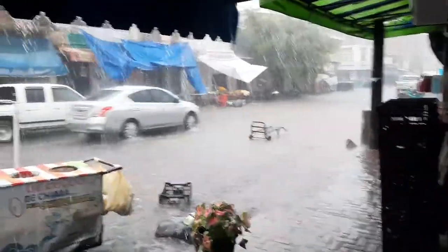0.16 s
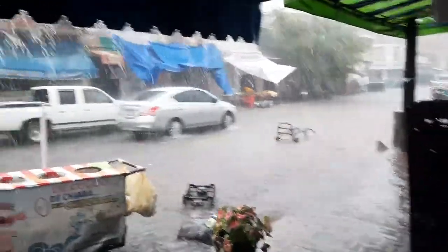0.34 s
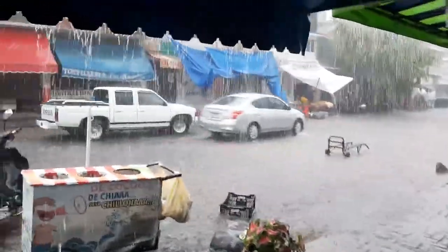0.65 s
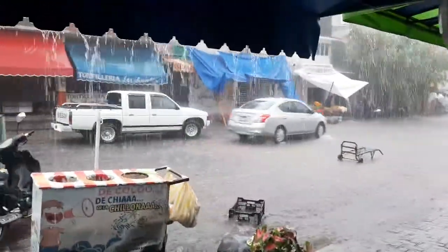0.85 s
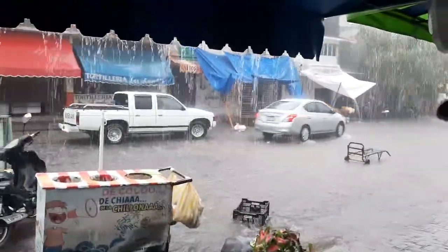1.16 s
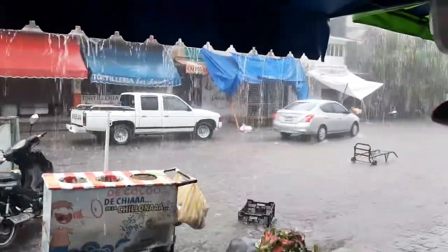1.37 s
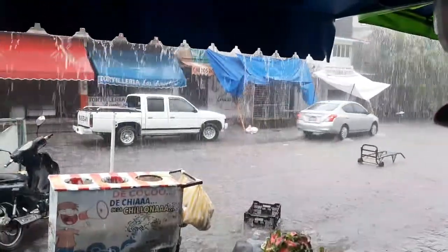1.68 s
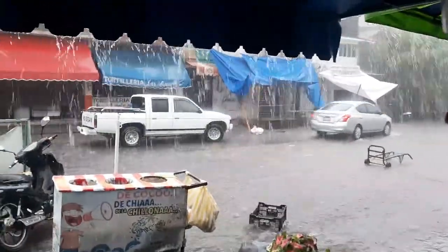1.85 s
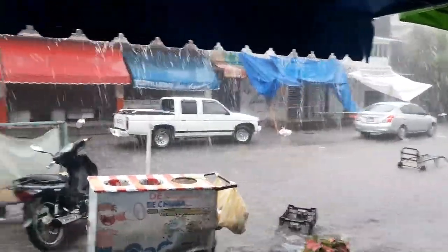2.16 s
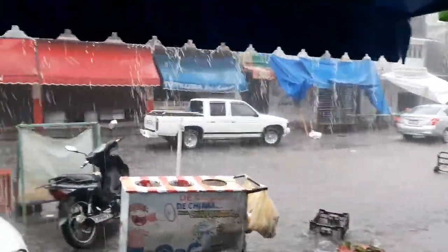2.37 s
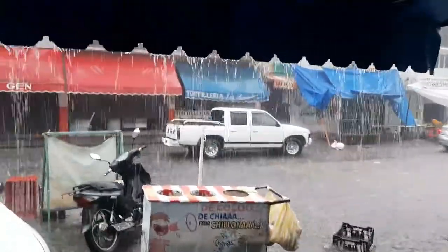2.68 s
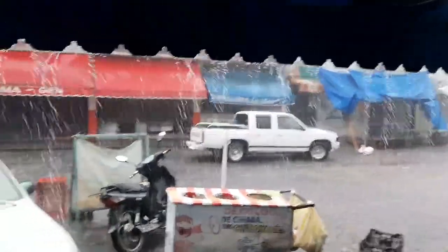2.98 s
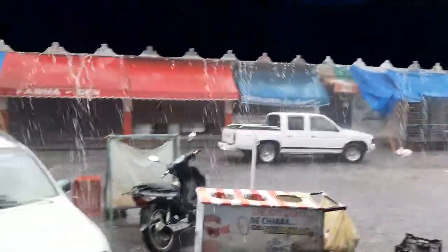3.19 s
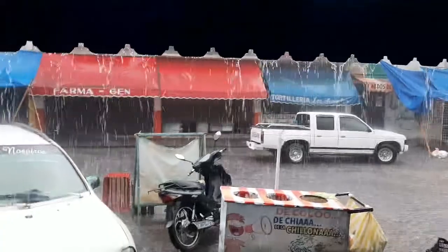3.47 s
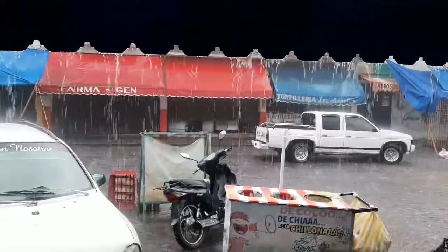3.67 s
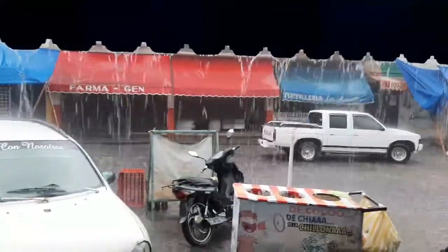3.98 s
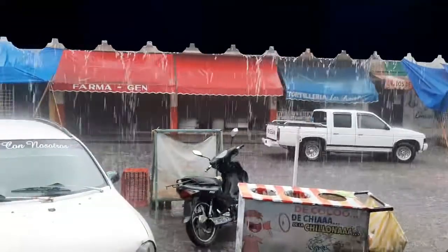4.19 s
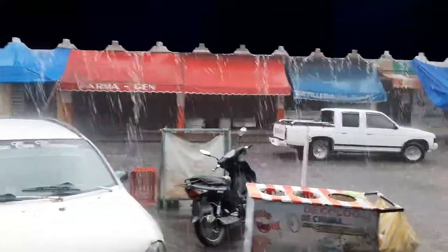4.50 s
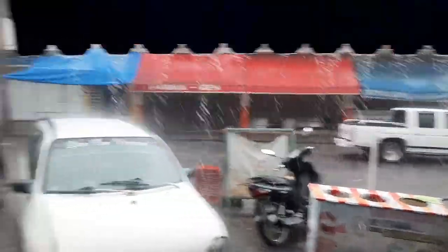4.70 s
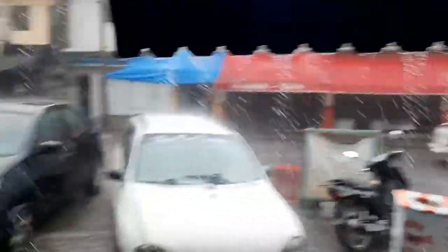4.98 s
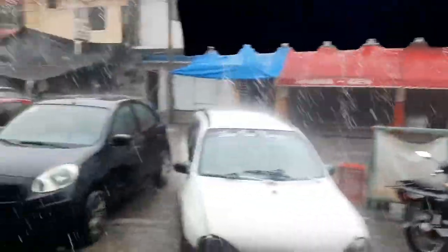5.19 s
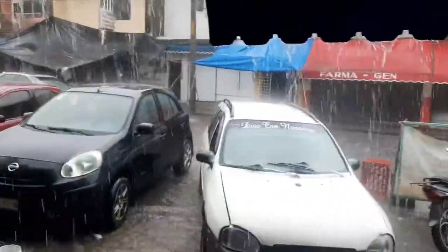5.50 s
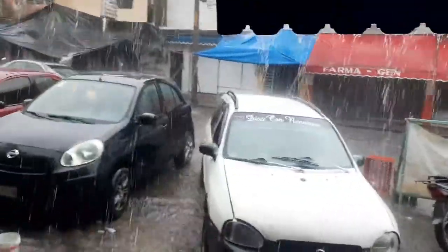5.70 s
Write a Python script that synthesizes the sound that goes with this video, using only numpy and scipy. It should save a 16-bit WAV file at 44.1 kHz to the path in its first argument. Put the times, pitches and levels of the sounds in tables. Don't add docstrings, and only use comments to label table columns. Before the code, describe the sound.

Under a market stall awning, a handheld stereo microphone hears a torrential shower with hail. From the start, a wide, dense rain wash fills both sides, growing slightly over the first second. Bright ticks and small splashes scatter close by, hailstones tock on car roofs, and the canvas overhead drums in uneven clumps with short, hollow, low-mid knocks, a strong one near 2.4 s. At about 2.5 s faint thunder mutters, with a bump near 3.0. It swells quickly and bursts at 3.5 s, a thick, lumpy, slightly squashed boom with brief resonant rings from canvas and metal, staying full until about 3.9. The rain is pushed well down beneath it. From 4.2 s the thunder rolls away in softer, uneven bass bumps and echoes, still grumbling to the end. A sharp splash snaps near 5.3 s as the rain comes back up. The treble is slightly thin and grainy, like compressed phone audio.

```python
import sys
import numpy as np
from scipy import signal
from scipy.fft import rfft, irfft
from scipy.io import wavfile
from scipy.ndimage import uniform_filter1d

SR = 44100
rng = np.random.default_rng(int(sys.argv[2]) if len(sys.argv) > 2 else 0)


def inscribe(sig):
    pcm = np.round(np.clip(np.atleast_2d(sig).T, -1, 1) * 32767)
    wavfile.write(sys.argv[1], SR, pcm.astype(np.int16))


def level_to_linear(level):
    exponent = np.asarray(level, float) / 20
    return 10 ** exponent


N = 257984

# (t/s, level/dB)
RAIN_LEVEL = [(0.0, -37), (0.21, -33.5), (0.88, -32), (2.13, -32), (3.4, -32), (3.58, -36.5), (3.68, -41),
              (4.6, -40.5), (5.1, -41.5), (5.3, -38), (5.85, -34.5)]
# (f/Hz, width/Hz, level/dB)
CANVAS = (322, 50, 5.7)


def evened(x):
    return x / np.sqrt(np.mean(x ** 2) + 1e-20)


def read(points, hz):
    f, value = np.transpose(points)
    return np.interp(np.log(hz + 1), np.log(f + 1), value)


def curves(rows, t):
    s, *columns = np.transpose(rows)
    return [np.interp(t, s, c) for c in columns]


def add(mix, s, sound):
    part = mix[..., round(s * SR):][..., :sound.shape[-1]]
    part += sound[..., :part.shape[-1]]


def grid(size):
    return np.arange(N // (size // 4) + 5) * (size // 4) / SR, np.fft.rfftfreq(size, 1 / SR)[:, None]


def patches(shape, bins, frames):
    z = rng.standard_normal(shape[::-1]).T
    over_hz = uniform_filter1d(z, max(round(bins), 1), 0)
    return evened(uniform_filter1d(over_hz, max(round(frames), 1), 1))


def diffuse(field_db, hz, size):
    # (f/Hz, share)
    likeness = [(60, 0.98), (110, 1), (200, 0.97), (380, 0.83), (700, 0.59), (1290, -0.058), (2380, -0.053),
                (4400, 0.016), (8120, 0.1), (15000, 0.083)]
    # (f/Hz, level/dB)
    left_lean = [(60, 0.0), (92, 0.0), (140, 0.0), (210, 0.0), (330, 0.0), (500, 2.0), (770, 2.0),
                 (1170, 4.0), (1790, 5.5), (2740, 5.0), (4190, 1.5), (6000, -1.5), (8200, 5.5),
                 (10500, 5.0), (15000, 2.0)]
    # (f/Hz, phase/radians)
    left_lead = [(60, 0), (130, 0), (260, 0.18), (520, 0.38), (950, 0.24), (1800, 0.26)]
    a, b, c, d = rng.standard_normal((field_db.shape[1], len(hz), 4)).T
    same = np.clip(read(likeness, hz), -1, 1)
    left = a + 1j * b
    right = same * left + np.sqrt(1 - same ** 2) * (c + 1j * d)
    right = right * np.exp(-1j * read(left_lead, hz))
    lean = level_to_linear(read(left_lean, hz) / 2)
    z = np.array([left * lean, right / lean]) * level_to_linear(field_db)
    return signal.istft(z, nperseg=size, noverlap=size - size // 4)[1][:, :N]


def canvas_bump(hz):
    centre_hz, width_hz, db = CANVAS
    return db / (1 + ((hz - centre_hz) / (width_hz / 2)) ** 2)


def ring(hz, t60, rise):
    t = np.arange(round(t60 * SR)) / SR
    x = (1 - np.exp(-t / rise)) * level_to_linear(-60 * t / t60) * np.sin(2 * np.pi * hz * t)
    return x / abs(x).max()


def lean_left(sound):
    return sound * level_to_linear(np.array([[.4], [-.4]]))


def wash():
    # (f/Hz, density/dB per Hz)
    wash_colour = [(15, -60), (25, -30), (37, -36), (91, -8), (144, -4.5), (254, -13), (316, -4.5),
                   (402, -7), (954, -7.5), (1280, -9), (2320, -9.5), (5970, -20), (8030, -24),
                   (13100, -27.5), (15800, -29)]
    # (middle t/s, length/s, drumming level/dB)
    clumps = [(0.15, 0.39, -1.5), (0.338, 0.1, 4.5), (0.69, 0.45, 2.5), (0.97, 0.21, -3.5),
              (1.154, 0.24, 2.5), (1.31, 0.068, -0.5), (1.44, 0.19, -3.5), (1.7, .08, -3), (1.785, .1, 4.5),
              (1.868, 0.092, -4), (2.11, 0.071, -1.5), (2.3, 0.45, 0.5), (2.52, .09, -2), (2.567, 0.079, 5),
              (2.714, 0.12, 4), (2.907, 0.085, 3.5), (2.97, 0.096, -4), (3.223, 0.23, -1.5)]
    t, hz = grid(size=1024)
    shape = (len(hz), len(t))
    hiss_share = np.clip(np.log2((hz + 1) / 2000) / 2, 0, 1)
    gusts = patches((1, len(t)), 1, 12) * 0.56 + patches((1, len(t)), 1, 3) * .5
    field_db = read(wash_colour, hz) + canvas_bump(hz) + 0.36 * patches(shape, 14, 10) + hiss_share * gusts
    steady = diffuse(field_db, hz, size=1024)

    rain_db = curves(RAIN_LEVEL, t)[0]
    duck_db = rain_db - rain_db.max()
    clump_db = sum(db * np.cos(np.pi * np.clip((t - s) / length, -.5, .5)) for s, length, db in clumps)
    drum_db = 0.8 - 0.42 * duck_db + clump_db
    roar_db = -0.86 + 0.046 * duck_db + 0.11 * clump_db
    drum_share = np.exp(-np.log2((hz + 1) / CANVAS[0]) ** 2 / 0.26)
    field_db = field_db + roar_db * (1 - hiss_share) * (1 - drum_share) + drum_db * drum_share
    return level_to_linear(15.5) * diffuse(field_db, hz, size=1024) / np.sqrt(np.mean(steady ** 2))


def patter():
    out, t = np.zeros((2, N)), np.arange(400) / SR
    for hz in np.geomspace(4500, 14500, num=12):
        hits = rng.random((2, N)) < 40 / SR
        size = level_to_linear(4.5 * np.minimum(rng.exponential(1, (2, N)), 5)) * hits
        ping = np.exp(-t * hz / 4.7) * np.sin(2 * np.pi * hz * t)
        spatter = 0.19 * np.exp(-t / .003) * rng.standard_normal(len(t))
        tick = ping + spatter
        out += signal.oaconvolve(size, tick[None] / np.linalg.norm(tick), axes=1)[:, :N]
    return level_to_linear(-15.5) * evened(out + .3 * out[::-1])


def clatter():
    out, t = np.zeros((2, N)), np.arange(600) / SR
    for hz in np.geomspace(700, 2800, num=12):
        hits = rng.random((2, N)) < 20 / SR
        size = level_to_linear(4.3 * np.minimum(rng.exponential(1, (2, N)), 3.5)) * hits
        tock = np.exp(-t * hz / 1.76) * np.cos(2 * np.pi * hz * t) / hz ** 0.15
        out += signal.oaconvolve(size, tock[None], axes=1)[:, :N]
    return level_to_linear(2.5) * evened(out + 0.28 * out[::-1]) * level_to_linear(np.array([[1.8], [-1.8]]))


def hail_knocks():
    # (t/s, peak/dB, f/Hz, ring/s)
    stones = [(0.072, -9.5, 373, 0.033), (0.153, -9, 325, 0.046), (0.314, -8, 346, 0.1),
              (0.414, -9.5, 373, 0.068), (0.693, -22, 285, 0.039), (1.141, -7.5, 322, 0.14),
              (1.443, -10, 320, 0.062), (1.518, -9, 338, 0.055), (1.764, -10, 300, 0.058),
              (1.942, -8, 310, 0.055), (1.995, -26, 312, 0.05), (2.072, -6.5, 870, 0.05),
              (2.262, -9, 372, 0.041), (2.294, -7, 328, 0.084), (2.422, -3, 334, 0.092),
              (3.038, -12, 300, 0.05), (3.115, -7, 360, 0.05), (3.344, -9.5, 676, 0.11)]
    out = np.zeros(N)
    for s, db, hz, t60 in stones:
        add(out, s, level_to_linear(db - 8.0) * ring(hz, t60, 0.0021))
    return lean_left(out)


def splashes():
    # (t/s, peak/dB, left over right/dB, length/s)
    bursts = [(0.184, -11, -2, 0.009), (0.334, -12, 6, 0.012), (0.6994, -13, 2.5, 0.012),
              (0.8294, -17, 1.5, 0.012), (0.891, -12, 4, 0.015), (1.5474, -13, 1.5, 0.012),
              (1.794, -23, 2.0, 0.012), (2.0154, -23, 1.0, 0.012), (2.64, -17, 1.0, 0.012),
              (4.22, -36, 1.5, 0.012), (4.5524, -29, 0.0, 0.012), (4.697, -28, 13, 0.012),
              (5.0529, -23, 2.5, 0.012), (5.23, -26, 1.5, 0.012), (5.325, -6.5, 0.5, 0.005)]
    out, spray = np.zeros((2, N)), rng.standard_normal((len(bursts), 2, 2000))
    bright = signal.butter(2, 3500, "high", fs=SR)
    t = np.arange(2000) / SR
    for (s, db, pan_db, length), noise in zip(bursts, spray):
        burst = (1 - np.exp(-t / .0006)) * np.exp(-(t / length) ** 2) * signal.lfilter(*bright, noise)
        add(out, s, level_to_linear(db - 9.5 + np.array([[pan_db], [-pan_db]]) / 2) * burst)
    return out


def metal_rings():
    # (t/s, peak/dB, f/Hz, ring/s)
    struck = [(3.5, -8, 309.5, 0.18), (3.625, -11.5, 795, 0.065), (3.69, -6, 307.6, 0.23),
              (3.77, -14, 194, .2), (3.8, -24, 55.3, .5), (3.9, -7, 302, 0.14), (3.919, -23, 58, 0.48),
              (4.848, -26, 473, 0.039), (5.32, -22, 660, 0.06), (5.49, -24, 698, 0.17),
              (5.705, -19.5, 640, 0.19)]
    out = np.zeros(N)
    for s, db, hz, t60 in struck:
        add(out, s, level_to_linear(db) * ring(hz, t60, 0.015))
    return lean_left(out)


def thunder():
    # (t/s, level/dB)
    stroke_level = [
        (2.5, -42),
        (3.16, -31),
        (3.42, -18),
        (3.48, -10.5),
        (3.72, -11.5),
        (3.9, -12.5),
        (4.18, -19),
        (4.45, -23),
        (4.82, -33.5),
    ]
    # (f/Hz, density/dB per Hz)
    roll_colour = [(15, -57), (25, -27), (41, -21), (104, 4.5), (223, -3.5), (306, -3), (421, -10),
                   (780, -13), (1010, -18.5), (2400, -23), (4000, -40), (5200, -69), (8800, -120)]
    t, hz = grid(size=2048)
    stroke = level_to_linear(2 * curves(stroke_level, t)[0])
    echo, echo_bright = echoes(t)
    age = t - 3.5
    crack_db = 7.5 * np.clip(1 + age / .28, 0, 1) - 4.5 * np.clip(age, 0, 2)
    crack_db = (stroke * crack_db + echo_bright) / (stroke + echo)
    bass_first_db, bass_late_db, bass_lag_s = -10.5, 0.2, 0.15
    bass_db = bass_first_db + (bass_late_db - bass_first_db) * np.clip(abs(age) / bass_lag_s, 0, 1)
    bass_db = (stroke * bass_db + echo * -2) / (stroke + echo)
    tilt_db = crack_db * np.exp(-np.log2((hz + 1) / 1000) ** 2 / 2.03)
    tilt_db = tilt_db + bass_db * np.clip(np.log2(220 / (hz + 1)), 0, 1)

    colour_db = read(roll_colour, hz) + canvas_bump(hz) - 60 * (hz > 4000)
    lumps_db = 1.36 * patches((len(hz), len(t)), 8, 3)
    norm = np.sqrt(np.mean(diffuse(colour_db + lumps_db, hz, size=2048) ** 2))
    now = np.arange(N) / SR
    swell = np.sqrt(level_to_linear(2 * curves(stroke_level, now)[0]) + echoes(now)[0])
    swell = swell * np.clip((now - stroke_level[0][0]) / 0.18, 0, 1)
    return swell * diffuse(colour_db + lumps_db + tilt_db, hz, size=2048) / norm


def thunder_bumps():
    # (t/s, peak/dB, f/Hz, ring/s)
    bumps = [(3.036, -5, 141, 0.084), (3.465, -10, 296, 0.11), (3.548, -1, 284, 0.062),
             (3.585, -1.5, 368, 0.073), (3.609, 0, 164, 0.093), (3.701, -4, 314, 0.15),
             (3.798, -2, 299, 0.07), (3.899, -10, 301, 0.17), (3.992, -3.5, 337, 0.078),
             (3.662, 0.5, 105, 0.075), (4.212, -15, 107, 0.093), (4.25, -8.5, 285, 0.11),
             (4.295, -9, 112, 0.09), (4.465, -10, 116, 0.1), (4.531, -14, 118, 0.073),
             (4.846, -5, 203, 0.093), (5.149, -10, 334, 0.074), (5.327, -12, 167, 0.15),
             (5.41, -15, 110, 0.09), (5.482, -9, 126, 0.12), (5.611, -14, 135, 0.09)]
    out = np.zeros(N)
    for s, db, hz, t60 in bumps:
        add(out, s, level_to_linear(db - 7) * ring(hz, t60, 0.0069))
        add(out, s + 0.00637, level_to_linear(db - 22) * ring(2.34 * hz, 0.35 * t60, 0.0035))
    return lean_left(out)


def echoes(t):
    # (t/s, peak/dB, time to die by 60 dB/s, brightness/dB)
    returns = [(2.55, -19, .8, 1), (2.68, -22.5, 0.65, 6), (2.87, -25, 0.96, 9), (3.02, -20, 1, -10),
               (4.29, -19.5, 0.34, -2), (4.46, -24, 1, 2), (4.63, -28, 0.62, 10), (4.83, -21.5, 1.5, 3),
               (4.99, -22, 2, 2.5), (5.14, -35, 1.5, -11), (5.31, -25.5, 1.3, 9), (5.4, -24, 1, -2),
               (5.47, -21, 2.8, -2), (5.68, -28, 3, 0)]
    rise_s = .025
    s, db, t60, bright_db = np.transpose(returns)[:, :, None]
    age = np.maximum(t - s, 0)
    fading = level_to_linear(db - 60 * np.maximum(age - rise_s, 0) / t60)
    power = (np.minimum(age / rise_s, 1) * fading) ** 2
    return power.sum(0), (power * bright_db).sum(0)


def scene():
    rain_gain = level_to_linear(curves(RAIN_LEVEL, np.arange(N) / SR)[0])
    rain = rain_gain * (wash() + patter() + clatter())
    return rain + hail_knocks() + splashes() + metal_rings() + thunder() + thunder_bumps()


def thin_out(x):
    # (f/Hz, share of bins)
    lost_share = [(2600, 0), (3600, .11), (4700, .2), (5600, .14), (6500, .15), (7500, .15), (9000, .06),
                  (11000, .02), (13500, .03), (15000, .1)]
    # (start t/s, end t/s)
    spells = [(0.0, 0.15), (0.27, 0.48), (0.55, 0.61), (0.69, 0.83), (0.955, 0.965), (1.19, 1.21),
              (1.33, 1.52), (1.62, 1.68), (1.78, 1.85), (1.97, 2.09), (2.26, 2.41), (2.53, 2.78),
              (2.86, 3.09), (3.25, 3.3), (3.72, 3.77), (3.86, 4.02), (4.14, 4.28), (4.36, 4.63),
              (4.75, 4.79), (5.0, 5.1), (5.25, 5.27), (5.38, 5.44), (5.51, 5.6), (5.76, 5.85)]
    hz, t, z = signal.stft(np.array([x[0] + x[1], x[0] - x[1]]) / 2, SR, nperseg=2048, noverlap=1792)
    shape = z.shape[1:]
    luck = evened(patches(shape, 6, 10) + np.array([.6 * patches(shape, 6, 10) for _ in z]))
    rank = (1 + np.tanh(.85 * luck)) / 2
    near = uniform_filter1d(abs(z) ** 2, size=5, axis=2)
    weak = near < .3 * uniform_filter1d(near, size=30, axis=1)
    bass = uniform_filter1d((abs(z[0, hz < 600]) ** 2).sum(0), size=20)
    share = read(lost_share, hz)[:, None] * np.clip((bass / np.median(bass)) ** .2, 1, 1.7)
    keep = (rank > share) * (1 - weak * np.clip(9 * share, 0, 1)) * (hz < 15790)[:, None]

    sum_gap = sum((t > start - .018) & (t < end + .018) for start, end in spells) > 0
    need = patches((1, len(t)), 1, 20)[0]
    notch, top_edge = (hz > 7700) & (hz < 8230), hz > 15200
    for gap_share, band in ((.2, notch), (.4, top_edge)):
        silent = [sum_gap, need < np.quantile(need, gap_share)]
        keep = keep * (1 - band[:, None] * np.array(silent)[:, None])
    mid, side = signal.istft(z * keep, SR, nperseg=2048, noverlap=1792)[1][:, :N]
    return np.array([mid + side, mid - side])


def low_pass(x):
    return signal.sosfilt(signal.butter(12, 15920, fs=SR, output="sos"), x)


def record(dry):
    # (f/Hz, level/dB)
    mic_colour = [(20, -12), (42, -2), (55, -2.5), (66, -0.5), (90, -2), (4000, 0), (4900, -0.5), (6000, 1),
                  (8500, -2.5), (10200, -2.5), (12200, 2.5), (14500, 0)]
    heard = irfft(rfft(dry) * level_to_linear(read(mic_colour, np.fft.rfftfreq(N, 1 / SR))), N)
    limited = 1.473 * np.tanh(heard / 1.53)
    return low_pass(thin_out(limited))


dry = scene()
out = record(dry)
inscribe(out)
```